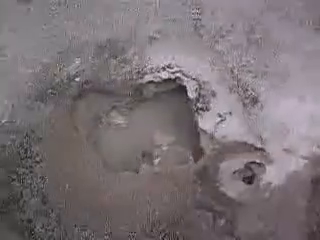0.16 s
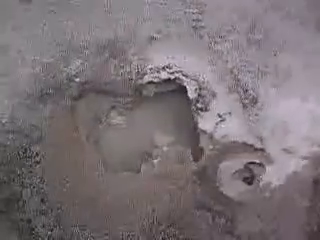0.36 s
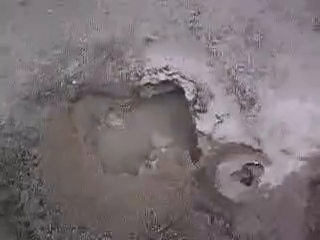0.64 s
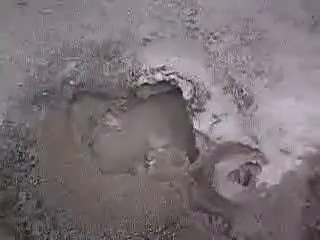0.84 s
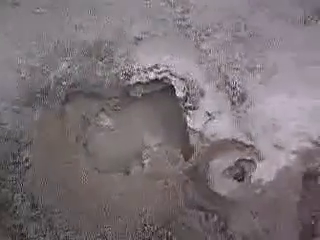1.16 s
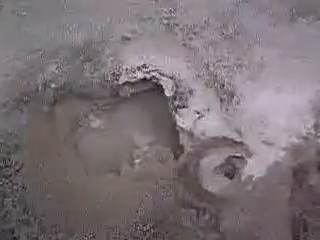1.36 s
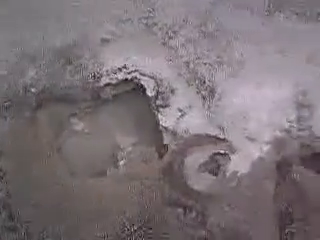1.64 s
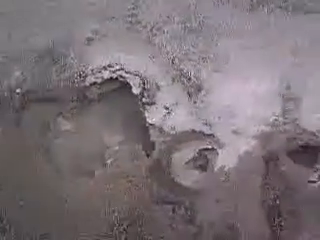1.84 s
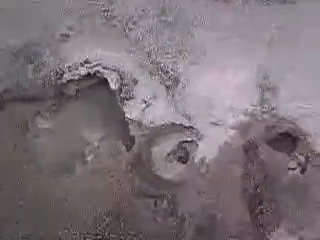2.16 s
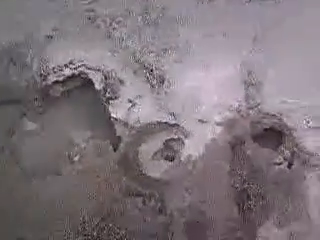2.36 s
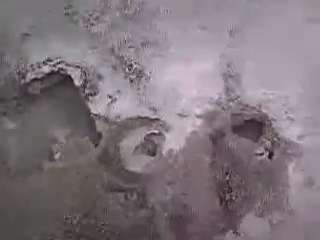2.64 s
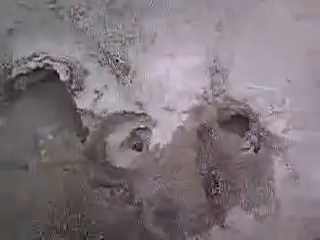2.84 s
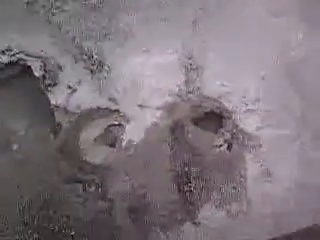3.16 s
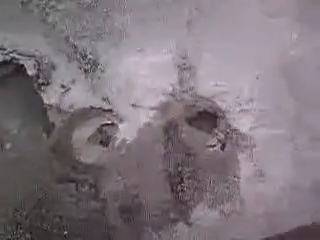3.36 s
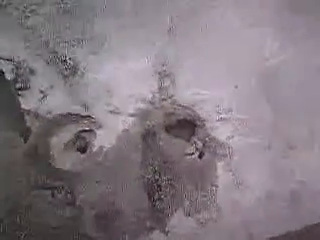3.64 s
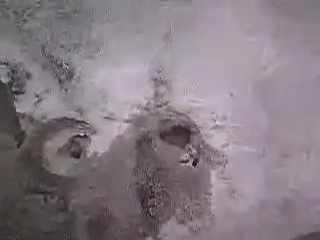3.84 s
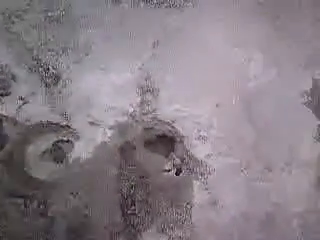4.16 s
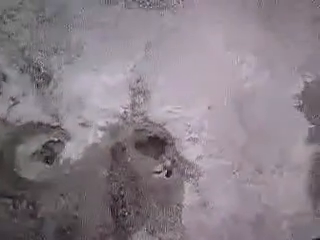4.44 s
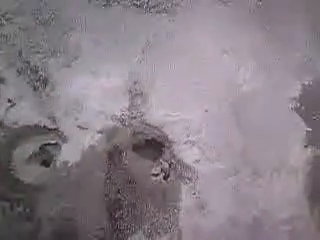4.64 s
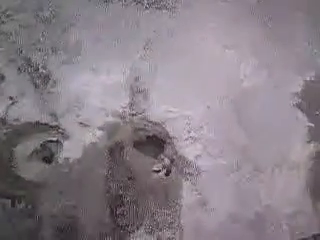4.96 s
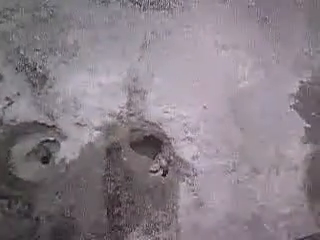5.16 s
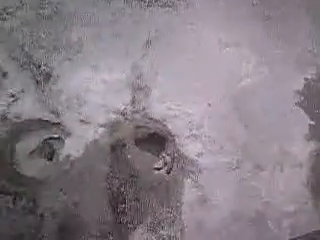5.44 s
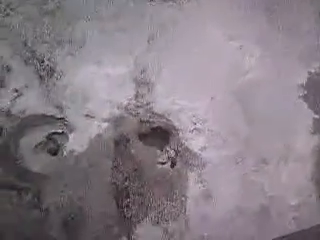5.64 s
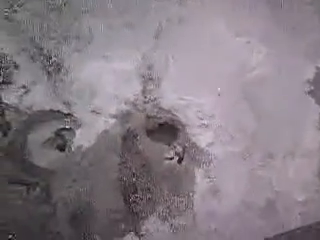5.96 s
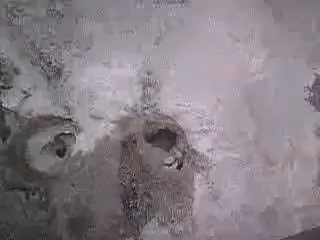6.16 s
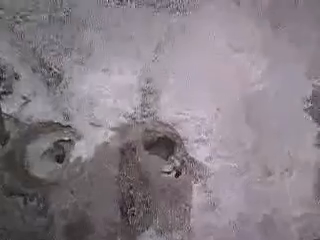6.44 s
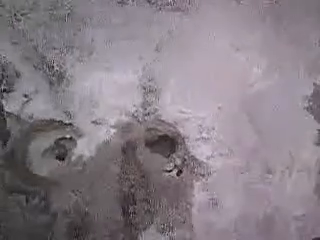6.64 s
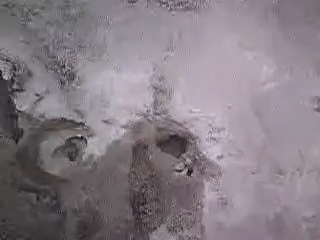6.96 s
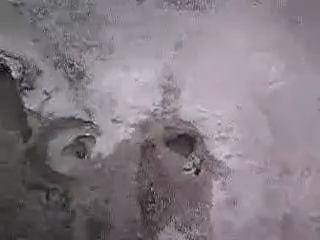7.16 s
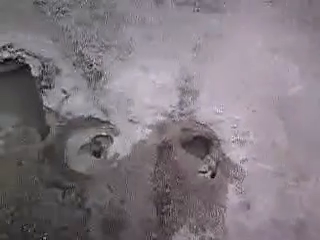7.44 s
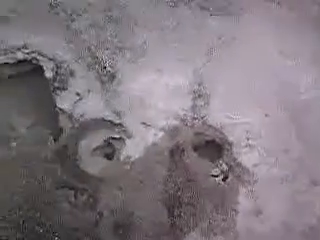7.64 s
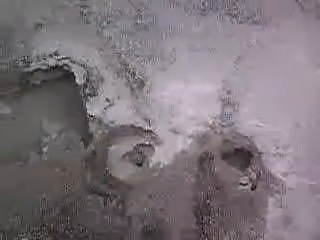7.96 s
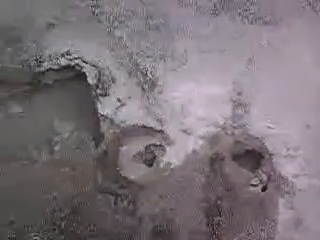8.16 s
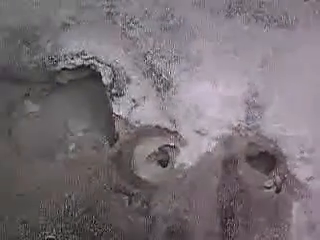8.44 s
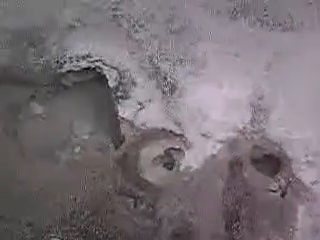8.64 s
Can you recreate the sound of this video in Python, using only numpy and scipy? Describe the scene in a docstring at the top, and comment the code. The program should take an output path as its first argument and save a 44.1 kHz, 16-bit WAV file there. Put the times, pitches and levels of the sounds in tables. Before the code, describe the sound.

Small geothermal vents bubble, splash and spit droplets continuously over a midrange hiss of escaping steam. Uneven wind buffets the handheld microphone from the start, slackens for a while, then returns much harder with lumpy low noise and clicking, distorted thumps. The gusts die down again as the muddy water keeps gurgling in the open air, and one more sharp thump lands near the end.

```python
"""Hot-spring vents in gusty wind

Steam hisses from small vents while muddy water gurgles in their throats: bubbles ring and burst,
splash and spit droplets. Gusts buffet a little handheld microphone with lumpy low noise and rumble.
Some thumps carry a sharp click; the hardest blows overload the input and its gain control ducks."""
import sys
import numpy as np
from scipy import signal
from scipy.io import wavfile

SR = 44100
rng = np.random.default_rng(int(sys.argv[2]) if len(sys.argv) > 2 else 0)


def unload_audio(sound):
    """Save the sound as a 16-bit wav file, at the path given as the first command line argument."""
    columns = np.transpose(np.atleast_2d(sound))
    # keep every value between -1 and 1, then stretch to whole-number steps
    steps = np.round(np.clip(columns, -1, 1) * 32767)
    wavfile.write(sys.argv[1], SR, steps.astype(np.int16))


N = 387638

# Tone of the steam: frequency_hz, density_db
STEAM_SPECTRUM = [(250, -8), (490, 0), (800, -10), (1000, 0), (1400, -10), (2050, -10), (2600, -10.5),
                  (3700, -27.5), (4600, -31.5), (5200, -38)]
# Balance of the small bubbles: pitch_hz, level_db
BUBBLE_SPECTRUM = [(300, -14), (500, -0.5), (1000, -0.5), (1400, -7.5), (2000, -0.5), (2800, -20.5),
                   (4200, -23)]
# How hard the water churns: time_s, gurgle_db
CHURN = [(0, -28), (.9, -26.5), (1.2, -31.5), (2.1, -27.5), (3.05, -28.5), (3.3, -22), (3.6, -30.5),
         (4.2, -28), (5.5, -31.5), (7.3, -27), (8.2, -28), (8.79, -30.5)]
# The loudest bubbles bursting in the vents: peak_s, level_db, pitch_hz
BUBBLE_BURSTS = [(0.123, -15, 1023), (0.195, -22, 1890), (0.25, -23, 1970), (0.278, -16.5, 1056),
                 (0.298, -13.5, 520), (0.453, -14.5, 1170), (0.454, -18.5, 2000), (0.557, -16.5, 940),
                 (0.687, -18.5, 830), (0.774, -21.5, 1480), (0.827, -19, 1820), (0.988, -22, 2100),
                 (1.174, -18, 1950), (1.431, -18, 2060), (1.584, -17, 2130), (1.597, -15, 2100),
                 (1.723, -23, 1730), (1.917, -30, 3840), (2.29, -24, 1210), (2.314, -18, 1060),
                 (2.332, -13, 1950), (2.385, -20, 800), (2.43, -15.5, 970), (2.588, -15, 564),
                 (2.715, -19, 740), (2.742, -20, 2090), (2.758, -18, 1740), (2.87, -20, 960),
                 (2.938, -13.5, 822), (2.955, -9, 440), (2.968, -8.5, 530), (3.17, -15, 470),
                 (3.176, -19.5, 1960), (3.222, -18.5, 490), (3.296, -17, 1940), (3.306, -9.5, 485),
                 (3.379, -20, 2040), (3.444, -10.5, 398), (3.689, -21, 675), (3.705, -12, 480),
                 (3.929, -13.5, 990), (3.977, -21.5, 644), (4.387, -20.5, 796), (4.447, -19, 1890),
                 (4.668, -16.5, 1840), (4.682, -14.5, 1800), (4.971, -19.5, 1040), (5.395, -19.5, 1970),
                 (5.552, -17, 730), (5.638, -19.5, 1750), (5.651, -13, 690), (5.85, -17, 596),
                 (6.32, -16, 1630), (6.437, -17, 1980), (6.794, -8, 518), (6.928, -11, 634),
                 (7.184, -15.5, 720), (7.46, -25, 1790), (7.584, -18.5, 1830), (7.718, -18.5, 1810),
                 (8.072, -15.5, 1900), (8.151, -12.5, 727), (8.28, -20, 2030), (8.314, -21, 1960),
                 (8.48, -17, 960), (8.537, -13, 1940)]
# Sharp treble ticks, from spitting water or coinciding with wind blows: start_s, level_db, pitch_hz
TICKS = [(0.7068, -14, 3200), (1.5973, -21, 3100), (1.9155, -14, 3760), (1.9817, -15, 2720),
         (2.3344, -23, 3040), (2.7704, -17, 2700), (3.105, -13, 2770), (3.453, -18, 3040),
         (3.9341, -14, 2900), (4.0105, -17.5, 3580), (4.7515, -18.5, 2850), (4.9683, -17.5, 2890),
         (5.6462, -17.5, 3130), (5.722, -11, 2650), (5.905, -20.5, 2710), (6.339, -14.5, 3280),
         (6.4365, -18.5, 3000), (6.6248, -13, 2710), (6.9535, -18, 3160), (7.23, -20, 2720),
         (7.249, -20.5, 3320), (7.7112, -18, 3010), (8.2546, -15.5, 2820)]
# Rise and fall of the gusts: time_s, wind_db, rumble_db (relative to the wind)
GUST_CURVE = [(0, -21, -3.5), (0.6, -22, -0.5), (0.95, -26, -0.5), (1.2, -30, -7), (1.6, -25, 2),
              (2.1, -20, -6.5), (2.6, -26, -5.5), (3.7, -27, -11.5), (4.45, -30, 0.5), (5.1, -24.5, -5.5),
              (5.43, -26, -1), (5.47, -12.5, -20), (5.66, -17, -23), (5.69, -19, -11), (5.75, -22.5, -18),
              (5.92, -10.5, -15), (5.98, -20.5, -10.5), (6.15, -8.5, -9.5), (6.3, -16.5, -7.5),
              (6.4, -19, -3), (6.75, -9.5, -21), (6.88, -18.5, -11), (6.95, -12.5, -5), (7.27, -16.5, -14),
              (7.31, -19.5, 0.5), (7.38, -19, -10), (7.43, -22.5, 1), (7.65, -25, -3), (8.45, -30.5, 0.5),
              (8.6, -27.5, 1.5), (8.79, -27.5, 0)]
# Body of the wind: frequency_hz, density_db
WIND_SPECTRUM = [(53, -35.5), (90, -4), (210, 2), (336, -2), (436, -2), (732, -16), (993, -33.5),
                 (1500, -42)]
# Deep rumble under the wind: frequency_hz, density_db
RUMBLE_SPECTRUM = [(12, -49.5), (24, -17.5), (78, -5), (129, -6), (160, -6.5), (210, -30)]
# The hardest single buffets on the microphone port: peak_s, level_db, pitch_hz
PORT_BUFFETS = [(0.162, -1.5, 323), (0.534, -1, 195), (0.696, -4, 129), (0.771, -2.5, 201), (0.83, -6, 177),
                (0.962, -11, 166), (1.305, -11.5, 118), (1.656, -0.5, 220), (1.718, -11, 130),
                (1.947, -4.5, 140), (2.026, -5, 181), (2.135, -7.5, 262), (2.354, -9, 160),
                (2.469, -8, 180), (2.505, -9, 240), (4.252, -15, 200), (4.465, -10.5, 226), (5.492, 1, 342),
                (5.512, -4, 304), (5.597, -3.5, 300), (5.615, -3, 290), (5.645, -7.5, 161),
                (5.77, -1.5, 290), (5.799, -3, 220), (5.877, -4.5, 447), (5.908, -2, 410), (5.937, -3, 334),
                (6.07, 0, 338), (6.182, -1, 215), (6.443, -1, 167), (6.484, -6, 135), (6.529, 1, 278),
                (6.652, -4.5, 230), (6.798, -4, 277), (6.932, -2, 334), (6.955, -2.5, 333),
                (7.022, -18, 261), (7.069, -11, 309), (7.13, -4, 268), (7.149, -7, 242), (7.272, -9, 300),
                (7.325, -7, 170), (7.388, -2.5, 194), (7.571, -7, 220), (7.615, -11.5, 201),
                (7.757, -9.5, 273), (7.898, -6.5, 156), (8.03, -7.5, 181), (8.693, -6, 370)]
# Single-pulse thumps and pops; the loudest overload the input: peak_s, level_db, half_length_s, polarity
THUMPS = [(0.3242, 4, 0.0025, 1), (2.349, -3, 0.006, -1), (4.305, -7, 0.002, 1), (5.477, 6.5, 0.0016, 1),
          (5.519, 3, 0.0022, -1), (5.553, -6, 0.0017, 1), (5.561, 20, 0.0021, 1),
          (5.7238, 13.5, 0.0024, -1), (6.1334, 8, 0.0025, -1), (6.1982, 36, 0.0042, 1),
          (6.34, 6, 0.0023, -1), (6.3627, 9.5, 0.0037, -1), (6.381, 2, 0.0021, -1), (6.508, 4, 0.0049, -1),
          (6.992, 1, 0.0022, -1), (7.2504, -2.5, 0.0013, 1), (7.26, -1.5, 0.0018, -1),
          (7.367, -2, 0.005, -1), (8.05, -1, 0.005, -1), (8.607, -1.5, 0.0015, 1), (8.6086, -2, 0.005, -1),
          (8.6976, 12, 0.0036, -1), (8.6987, 11, 0.0013, 1)]
# Sharp clicks on some of the thumps: start_s, jump_db, polarity
THUMP_CLICKS = [(0.3247, -2, -1), (5.4783, -19, -1), (5.5177, -30, 1), (6.198, -27, -1), (6.3621, -22, 1),
                (6.505, -26.5, 1), (7.2591, -21, 1), (8.6985, -3, 1)]


def steam():
    """Steam escapes the vents as a fluttering midrange hiss."""
    return from_db(-32.5) * patchy_noise(STEAM_SPECTRUM, shared_db=3.0, own_db=2.5, flicker_hz=17.9)


def steam_top():
    """A narrow, steady band of noise gives the hiss its smooth top."""
    return from_db(-54) * rms_one(ring(rng.standard_normal(N), hz=3400, t60_s=0.0056))


def gurgle(level_db, bubbles_per_s=650, ring_cycles=18.0):
    """Small bubbles come in splashy clusters, each ringing briefly at its own pitch."""
    sizes = from_db(3.4 * np.minimum(rng.exponential(1, N), 3)) * rng.choice([-1, 1], N)
    clustering = from_db(5.0 * drift(11.0) + 5.0 * drift(30.0))
    born = rng.random(N) < bubbles_per_s * clustering / SR
    pitches = np.geomspace(300, 4200, 24)
    pitch_index = rng.integers(0, len(pitches), N)
    bubbles = np.zeros(N)
    for k, hz in enumerate(pitches):
        clicks = sizes * born * (pitch_index == k)
        bubbles += from_db(at_hz(BUBBLE_SPECTRUM, hz)) * ring(clicks, hz, ring_cycles / hz)
    return from_db(level_db) * rms_one(bubbles)


def bursts():
    """Each loud bubble bursts with a quick rising blip."""
    return blips(BUBBLE_BURSTS, cycles=10.05, length_range_s=(.0037, .0105), rise=0.14, skew=0.451)


def splashes(attack_s=0.0056, below_burst_db=12.86):
    """Each burst throws up water: a longer puff of noise around its pitch."""
    out = np.zeros(N)
    t = np.arange(int(0.076 * SR)) / SR
    envelope = t / attack_s * np.exp(1 - t / attack_s)
    for peak_s, level_db, hz in BUBBLE_BURSTS:
        band = signal.butter(2, [hz / 1.16, hz * 1.16], "band", fs=SR)
        spray = rms_one(signal.lfilter(*band, rng.standard_normal(len(t))))
        add(out, peak_s - .008, from_db(level_db - below_burst_db) * envelope * spray)
    return out


def spit(drops_per_s=90):
    """Spat droplets make a fine, bright random patter."""
    born = rng.random(N) < drops_per_s / SR
    sizes = from_db(5.0 * np.minimum(rng.exponential(1, N), 2.2)) * rng.choice([-1, 1], N)
    drops = from_db(-58.5) * rms_one(born * sizes)
    return ring(drops, hz=3650, t60_s=0.0032) - ring(drops, hz=2380, t60_s=0.0023)


def ticks(t60_s=.004):
    """Sharp treble ticks ring briefly, from spitting water or coinciding with wind blows."""
    out = np.zeros(N)
    click = signal.unit_impulse(int(2 * t60_s * SR))
    for start_s, level_db, hz in TICKS:
        add(out, start_s, from_db(level_db) * ring(click, hz, t60_s))
    return out


def wind(wind_db, rumble_db):
    """Eddies at the microphone port: lumpy low noise over a deeper rumble, plus single buffets."""
    lumps = patchy_noise(WIND_SPECTRUM, shared_db=4.0, own_db=2.0, flicker_hz=27.0)
    rumble = patchy_noise(RUMBLE_SPECTRUM, shared_db=2.0, own_db=1.0, flicker_hz=13.0)
    flow = lumps + from_db(rumble_db) * rumble
    pressure = flow * np.abs(flow) ** 0.13   # grows faster than air speed, so crests are sharp
    buffets = blips(PORT_BUFFETS, cycles=2.06, length_range_s=(.009, .026), rise=0.075, skew=.6)
    return from_db(wind_db) * pressure + buffets


def thumps():
    """Each push or pull on the diaphragm is one bell-shaped pulse between two smaller opposite swings."""
    out = np.zeros(N)
    for peak_s, level_db, half_s, polarity in THUMPS:
        lobe = np.sign(polarity) * np.exp(-2 * np.linspace(-3.5, 3.5, int(2 * half_s * SR)) ** 2)
        start_s = peak_s - half_s
        add(out, start_s, from_db(level_db) * lobe)
        for shift, swing_db in ((-0.7743, -10.5), (0.6351, -5)):   # just before, just after
            add(out, start_s + shift * half_s, -from_db(swing_db + min(level_db, 0)) * lobe)
    return out


def thump_clicks(decay_s=0.00025, edge_hz=3550):
    """Sharp clicks on some of the thumps: a jump that dies away fast, its edge a little dull."""
    jumps = np.zeros(N)
    for start_s, jump_db, polarity in THUMP_CLICKS:
        add(jumps, start_s, np.sign(polarity) * from_db([jump_db]))
    decaying = signal.lfilter([1], [1, -np.exp(-1 / (decay_s * SR))], jumps)
    return signal.lfilter(*signal.butter(2, edge_hz, fs=SR), decaying)


def gain_control(x, threshold_db=5, attack_s=0.00053, release_db_per_s=470):
    """The gain ducks a moment after a hard blow, then recovers at a steady rate."""
    over_db = np.maximum(20 * np.log10(np.abs(x) + 1e-9) - threshold_db, 0)
    ramp_db = release_db_per_s * np.arange(N) / SR
    held_db = np.maximum.accumulate(over_db + ramp_db, axis=1) - ramp_db
    pole = np.exp(-1 / (attack_s * SR))
    duck_db = signal.lfilter([1 - pole], [1, -pole], held_db)
    return x * from_db(-duck_db)


def circuit_noise(x, fizz_edge_hz=9100, whine_hz=12000):
    """The circuit adds a faint fizz that swells with loud sound, and a thin steady whine."""
    swell = 1 + from_db(19.5) * np.abs(x)
    fizz = signal.lfilter(*signal.butter(1, fizz_edge_hz, fs=SR), swell * rng.standard_normal(x.shape))
    whine = np.sqrt(2) * np.sin(2 * np.pi * whine_hz * np.arange(N) / SR)
    return from_db(-89.5) * fizz + from_db(-90) * whine


def blips(rows, cycles, length_range_s, rise, skew):
    """One short, randomly stretched tone a row: it swells, peaks on cue and fades, gliding upward."""
    out = np.zeros(N)
    for (peak_s, level_db, hz), (phase, stretch) in zip(rows, rng.random((len(rows), 2))):
        length_s = np.clip(cycles / hz, *length_range_s) * (0.753 + 0.49 * stretch)
        t = np.arange(int(length_s * SR)) / SR
        envelope = np.sin(np.pi * (t / length_s) ** skew) ** 2
        turns = phase + hz * t * (1 + rise * (t / length_s - .7))
        attack_s = .5 ** (1 / skew) * length_s
        add(out, peak_s - attack_s, from_db(level_db) * envelope * np.sin(2 * np.pi * turns))
    return out


def patchy_noise(spectrum, shared_db, own_db, flicker_hz):
    """Third-octave bands of noise that flicker partly together, partly alone; rms 1."""
    bottom_hz, top_hz = spectrum[0][0], spectrum[-1][0]
    edges = bottom_hz * 2 ** np.arange(0, np.log2(top_hz / bottom_hz) + .34, 1 / 3)
    together = drift(flicker_hz)
    white = rng.standard_normal((2, N))
    out = np.zeros(N)
    for k, (low, high) in enumerate(zip(edges, edges[1:])):
        band = signal.sosfilt(signal.butter(2, [low, high], "band", fs=SR, output="sos"), white[k % 2])
        flicker_db = shared_db * together + own_db * drift(flicker_hz)
        out += band * from_db(at_hz(spectrum, np.sqrt(low * high)) + flicker_db)
    return rms_one(out)


def drift(rate_hz):
    """A smooth random wobble, rms about 1."""
    hop, warm_up = 20, 2000
    pole = np.exp(-2 * np.pi * rate_hz * hop / SR)
    white = rng.standard_normal(N // hop + warm_up + 2)
    slow = signal.lfilter([1], [1, -2 * pole, pole * pole], white)[warm_up:]
    return np.interp(np.arange(N) / hop, np.arange(len(slow)), rms_one(slow))


def ring(clicks, hz, t60_s):
    """A resonator: a unit click sets off a decaying sine of height 1."""
    r, w = from_db(-60 / (t60_s * SR)), 2 * np.pi * hz / SR
    return signal.lfilter([0, np.sin(w)], [1, -2 * r * np.cos(w), r * r], clicks + 1e-18)


def at_hz(spectrum, hz):
    """Read a spectrum's level on a log-frequency axis."""
    frequencies, levels_db = np.transpose(spectrum)
    return np.interp(np.log(hz), np.log(frequencies), levels_db)


def in_time(rows):
    """A table's level curves at every sample."""
    times_s, *curves = np.transpose(rows)
    return [np.interp(np.arange(N) / SR, times_s, curve) for curve in curves]


def add(out, start_s, sound):
    """Mix a short sound in on cue."""
    i = round(start_s * SR)
    out[i:i + len(sound)] += sound[:N - i]


def from_db(db):
    """Decibels to gain."""
    return 10 ** (np.asarray(db) / 20)


def rms_one(x):
    """Scale to rms 1."""
    return x / np.sqrt(np.mean(x ** 2) + 1e-20)


def scene():
    """Wind and hot spring meet at one microphone."""
    gusts = wind(*in_time(GUST_CURVE))
    spring = steam() + spit() + steam_top() + bursts() + splashes() + gurgle(*in_time(CHURN))
    return (spring + ticks() + gusts + thumps())[None]


def record(dry):
    """The handheld chain ducks, saturates, cuts the treble, clicks, clips and adds its own noise."""
    ducked = gain_control(dry)
    ceiling, knee, dc_offset = .92, 4.0, -.0173
    saturated = ducked / (1 + np.abs(ducked / ceiling) ** knee) ** (1 / knee)   # soft preamp overload
    band_edge_hz, cutoff_hz = 5780, 15500
    dulled = signal.sosfilt(signal.cheby2(10, 65, band_edge_hz, fs=SR, output="sos"), saturated)
    clipped = np.clip(dulled + thump_clicks() + dc_offset, -.95, .95)
    noisy = clipped + circuit_noise(dulled)
    return signal.sosfilt(signal.cheby2(12, 70, cutoff_hz, fs=SR, output="sos"), noisy)


dry = scene()
out = record(dry)
unload_audio(out)
```